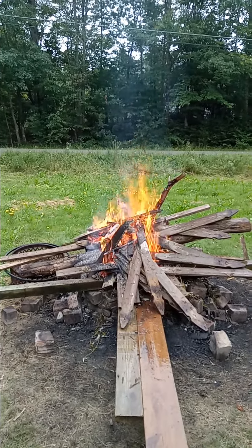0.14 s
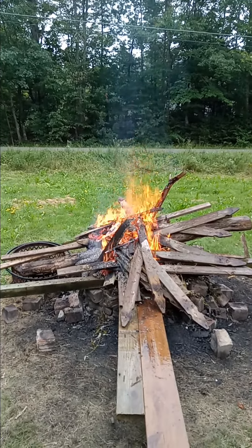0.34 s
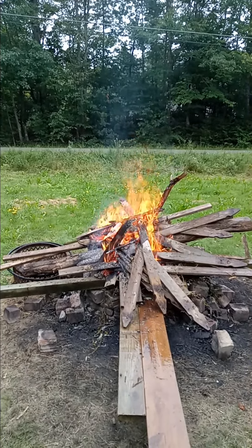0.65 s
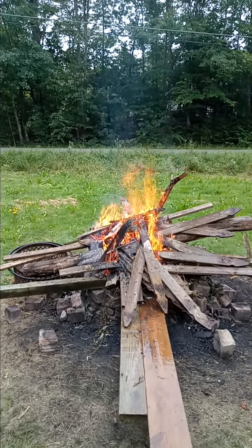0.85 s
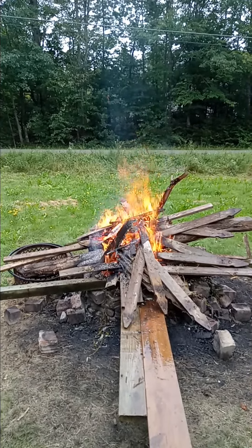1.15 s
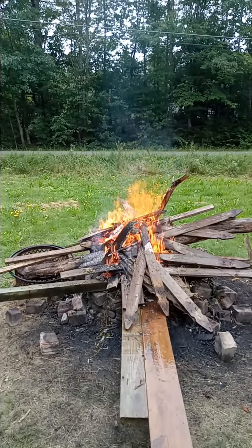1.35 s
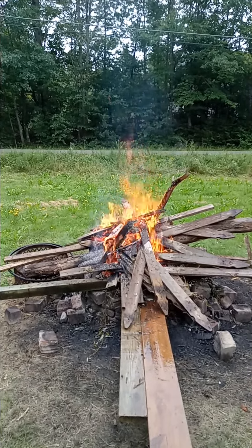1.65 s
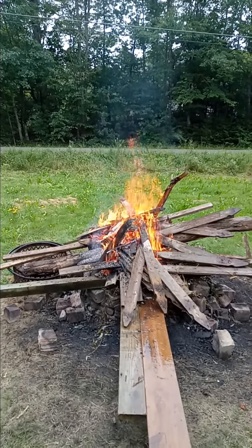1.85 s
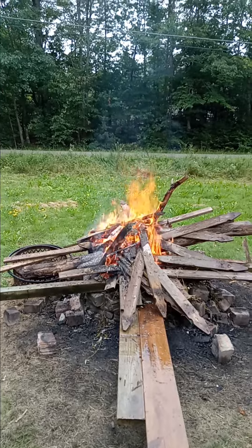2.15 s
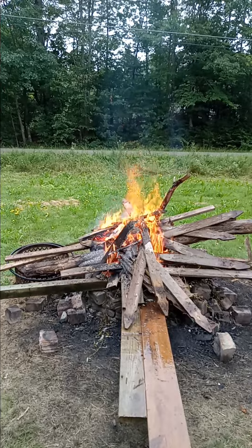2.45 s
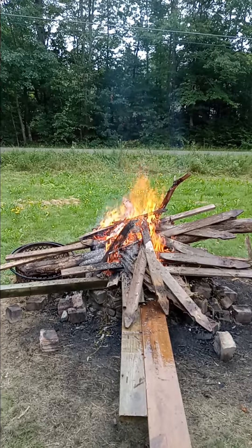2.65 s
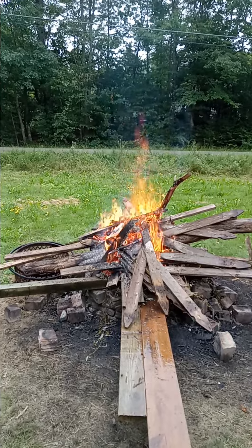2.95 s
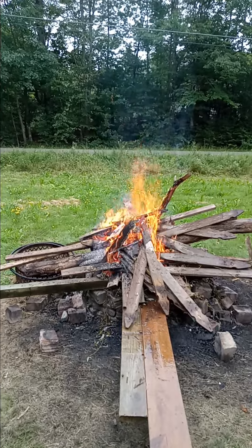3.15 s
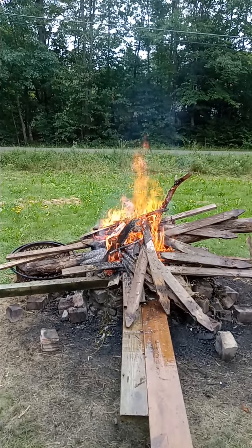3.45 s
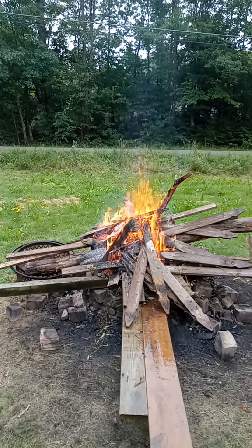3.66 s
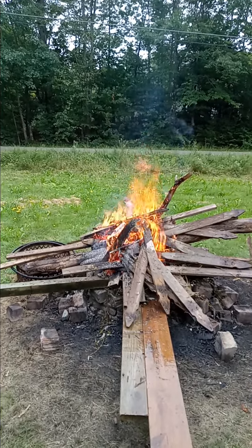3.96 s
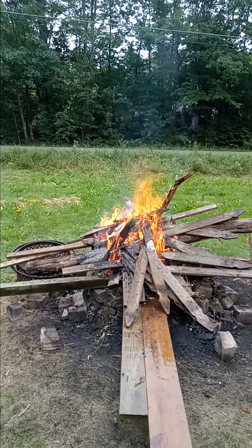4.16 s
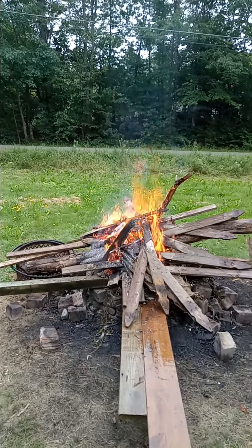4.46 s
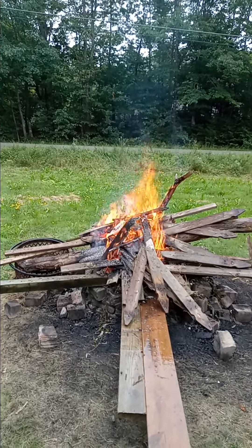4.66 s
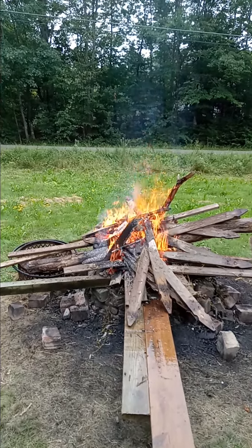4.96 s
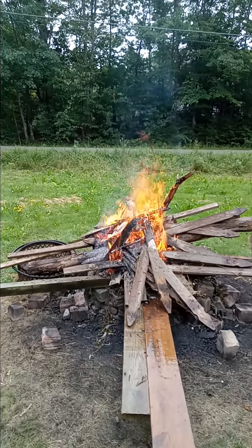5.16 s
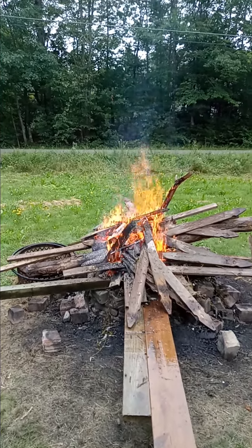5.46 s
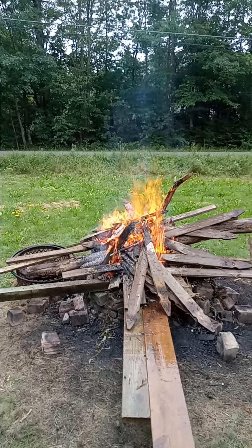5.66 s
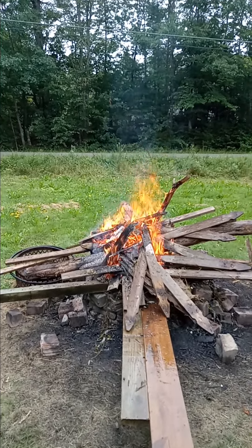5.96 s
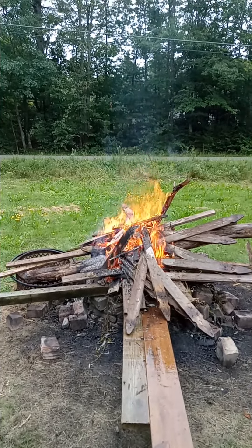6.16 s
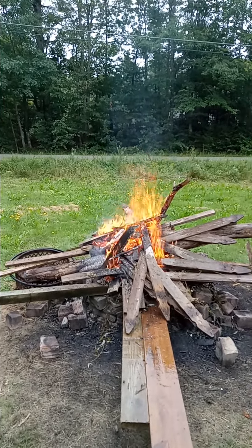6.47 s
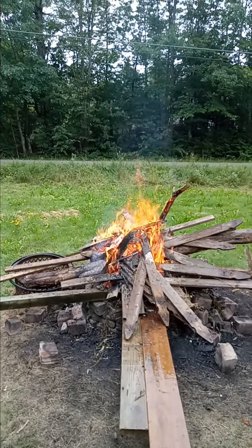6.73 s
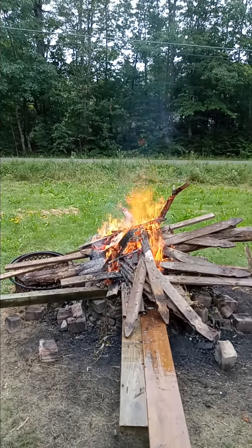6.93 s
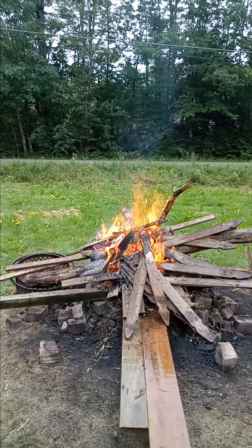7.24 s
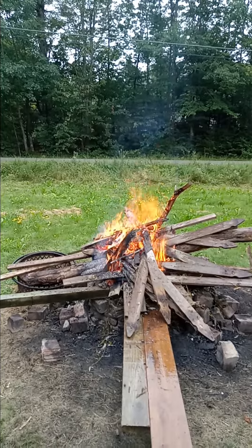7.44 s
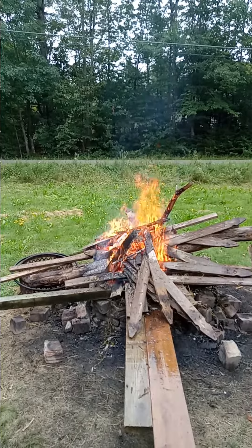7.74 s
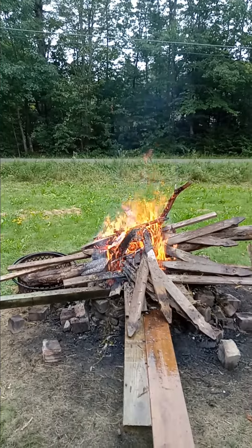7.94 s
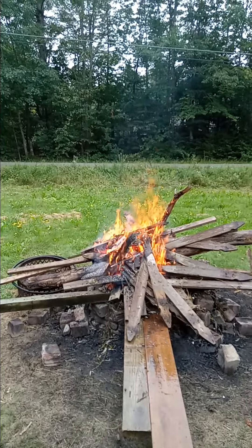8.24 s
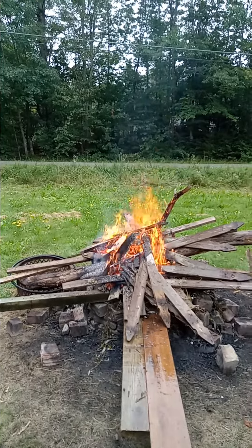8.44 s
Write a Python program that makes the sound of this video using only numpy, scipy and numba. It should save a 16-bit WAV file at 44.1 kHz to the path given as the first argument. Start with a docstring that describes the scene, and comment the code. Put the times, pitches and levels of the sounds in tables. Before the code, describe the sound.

A pile of planks burns outdoors, heard from about two metres on a phone. Sharp resin pops, woody cracks and fine ticks scatter irregularly, with brief sizzling puffs between them. Activity thins after two seconds, then thickens into clusters from four seconds on, with a heavy thump around 5.6 and a very loud crack near 7.4. The flames flutter softly in the bass, over a faint wavering hum, in a dry open space.

```python
"""On a lawn, a pile of planks burns two metres from a phone.
Flames rumble and roar as filtered noise; a far machine hums as a wavering tone. Pockets of steam and resin pop
and small embers tick as short bursts of noise. Gas jets sizzle out of the cracks as swelling puffs of hiss,
and a few puffs of pressure thump the microphone. The phone's gain control ducks after every loud pop."""
import sys
import numpy as np
from scipy import signal
from scipy.fft import rfft, irfft
from scipy.io import wavfile
from scipy.ndimage import uniform_filter1d
from numba import njit

SR = 44100
rng = np.random.default_rng(int(sys.argv[2]) if len(sys.argv) > 2 else 0)


def output_pcm(signal):
    """Save a mono or channel-first signal as 16-bit PCM at the path in sys.argv[1].

    Samples are clipped to [-1, 1] before scaling.
    """
    pcm = np.clip(np.atleast_2d(signal).T, -1, 1) * 32767
    wavfile.write(sys.argv[1], SR, np.round(pcm).astype(np.int16))


N = 379260

# All levels are those ahead of the phone's gain control.
# Pops of steam and resin: t/s, peak of the main crack/dB, centre f/Hz,
# woody bass (rms of its first 6 ms against that peak)/dB
POPS = [(.359, -18.5, 4800, -32), (0.397, -28.5, 1500, -41), (.543, -17, 2200, -17.5),
        (0.549, -17.5, 5000, -23), (.825, -12.5, 2720, -15.5), (1.541, -12.5, 4400, -33),
        (1.676, -27, 6070, -25), (1.716, -29.5, 1950, -30), (1.731, -15.5, 2580, -19),
        (1.743, -23, 4730, -14), (1.838, -5, 3530, -31), (1.987, -23, 6300, -40), (2.131, -13, 4620, -32.5),
        (2.982, -14, 3320, -41), (3.206, -17, 2880, -15.5), (3.392, -10.5, 2660, -22.5),
        (3.934, -11.5, 4570, -30.5), (3.968, -9.5, 4600, -29.5), (4.082, -15.5, 3670, -25),
        (4.147, -9.5, 1400, -13), (4.168, -0.5, 7560, -27), (4.227, -22.5, 1340, -5.5),
        (4.311, -28.5, 3400, -20.5), (4.688, -19, 6160, -34.5), (4.707, -25.5, 2100, -25),
        (4.84, -24, 3200, -36), (4.919, -12.5, 2270, -20.5), (4.974, -10, 3440, -25.5),
        (5.063, -18, 5600, -20.5), (5.07, -13, 2860, -22), (5.209, -16.5, 3500, -32),
        (5.239, -24.5, 1980, -16), (5.257, -12.5, 5800, -30), (5.266, -16, 5600, -21.5),
        (5.291, -12.5, 5260, -21.5), (5.316, -4.5, 5530, -26), (5.743, -12.5, 1160, -16),
        (6.296, -12, 4700, -33.5), (6.343, -15, 4560, -22.5), (6.399, -27.5, 3200, -18),
        (6.601, -18, 5630, -29.5), (6.622, -26.5, 7100, -29), (6.836, -23.5, 4200, -25),
        (7.174, -25, 6400, -32), (7.325, -18.5, 5600, -23.5), (7.364, 1.5, 2780, -24.5),
        (7.461, -20.5, 2920, -27), (7.473, -15.5, 5960, -32), (7.492, -14, 5630, -29.5),
        (7.659, -9.5, 6100, -34), (7.802, -20, 3000, -15), (7.849, -27, 5250, -29),
        (7.872, -23.5, 3300, -8.5), (7.89, -17.5, 4700, -15), (8.058, -13, 4400, -33),
        (8.443, -16.5, 3430, -34)]
# Dry ticks of bark and embers, with almost no woody bass: t/s, peak of the main crack/dB, centre f/Hz
TICKS = [(0.025, -36.5, 1850), (0.129, -20.5, 5350), (.261, -7, 5230), (.379, -21, 5170),
         (.662, -32.5, 2200), (.863, -1, 4800), (.953, -16, 5770), (1.231, -19, 5560), (1.312, -27.5, 6200),
         (1.363, -26, 4600), (1.558, -33, 6000), (1.654, -24.5, 5900), (1.82, -16.5, 2900),
         (1.944, -30, 1900), (2.346, -37, 5430), (2.471, -35, 8100), (2.669, -23.5, 5700),
         (2.704, -27.5, 2520), (2.781, -37, 2970), (2.8, -33.5, 2230), (3.115, -16.5, 4480),
         (3.347, -38, 12900), (3.371, -21, 5640), (3.435, -27, 4560), (3.461, -30.5, 3100),
         (3.513, -32, 7440), (3.53, -11, 6160), (3.582, -28, 6140), (3.793, -35, 5070), (3.879, -28, 3560),
         (4.428, -37.5, 5280), (4.446, -31, 5230), (4.572, -31.5, 6400), (4.578, -29.5, 5830),
         (4.859, -30, 2020), (4.903, -15.5, 4800), (5.021, -31, 4700), (5.123, -20, 4500),
         (5.341, -19.5, 7650), (5.416, -15, 6100), (5.494, -32.5, 5970), (5.555, -16.5, 5300),
         (5.595, -4.5, 8640), (5.667, -18.5, 5300), (5.899, -23, 7200), (6.039, -12, 5300),
         (6.076, -14, 5100), (6.251, -33, 5560), (6.275, -18.5, 5000), (6.665, -33.5, 5750),
         (6.704, -25, 6160), (6.766, -31.5, 3750), (6.819, -19.5, 6700), (6.895, -33, 2900),
         (6.94, -33.5, 7000), (6.953, -37, 5900), (7.024, -35.5, 5700), (7.053, -25, 6000),
         (7.126, -31, 5370), (7.146, -39, 6000), (7.269, -18, 6700), (7.311, -17.5, 1620),
         (7.449, -30, 3000), (7.525, -25, 5450), (7.568, -30.5, 4800), (7.608, -28.5, 3740),
         (8.01, -33, 2560), (8.107, -30, 5430), (8.136, -18.5, 6200), (8.412, -29.5, 7700),
         (8.513, -25.5, 8400)]
# Colour of the ground reflection and the microphone port: f/Hz, level/dB
PHONE = [(200, -12.5), (451, -16), (689, -5), (1020, -10.5), (1360, 6.5), (1640, -2), (2210, 2.5),
         (3310, 1), (3840, -4), (5450, 1), (8810, -9), (11400, -24), (13700, -33.5), (15200, -24.5)]
# Puffs of gas: t of the top/s, nominal fade time/ms, nominal top level/dB, centre f/Hz
PUFFS = [(.135, 27.5, -54, 5460), (0.364, 45, -44.5, 5200), (0.56, 22.5, -53, 4230),
         (0.674, 23.5, -53.5, 2900), (0.899, 43.5, -55.5, 5370), (1.242, 23, -61, 4960),
         (1.671, 24, -59, 4500), (1.736, 23, -50, 3500), (1.91, 64.5, -41.5, 4340),
         (2.204, 50.5, -45.5, 5100), (3.058, 32, -55, 6660), (3.28, 34.5, -52, 3320),
         (3.463, 35, -48, 3030), (3.6, 38.5, -50.5, 7250), (3.799, 17, -64, 5470), (4.244, 50, -37.5, 8900),
         (4.25, 48, -46.5, 2580), (4.711, 27, -44, 6250), (4.849, 28, -54, 3200), (5.062, 49, -33, 4340),
         (5.16, 93.5, -49.5, 3080), (5.68, 15.5, -48, 5060), (5.762, 18, -39, 5300), (6.086, 33, -61, 5340),
         (6.275, 20.5, -70, 4500), (6.62, 24.5, -57, 4470), (6.83, 27, -67, 4500), (7.185, 20.5, -52, 5500),
         (7.44, 40, -47.5, 2750), (7.56, 46.5, -48.5, 3100), (7.709, 47.5, -45, 10100),
         (7.915, 44, -32.5, 3640), (8.05, 69, -51, 3800), (8.151, 20.5, -59, 4960), (8.478, 38, -44, 6000)]

SIZE = 2048  # length of one burst, samples
REACH = 8192  # samples worked out on each side of a puff's top
MS = .001  # seconds in a millisecond


def undb(db):
    """Turns dB into a plain factor."""
    return 10 ** (np.asarray(db) / 20)


def level(x, db):
    """Sets the average strength (rms) of a sound."""
    return x * undb(db) / np.sqrt(np.mean(x ** 2))


def shape_db(table, hz):
    """Reads a table of f/Hz and level/dB along a log-frequency axis."""
    table_hz, table_db = np.array(table).T
    return np.interp(np.log(hz + 1), np.log(table_hz), table_db)


def bell_db(hz, centre_hz, octaves):
    """A hump with 0 dB on top, 6 dB down this many octaves to either side."""
    distance = np.log2((hz + 1) / centre_hz) / octaves
    return np.maximum(-6 * distance ** 2, -70)


def ripple_db(shape, depth_db, count):
    """Random peaks and dips along frequency: the hollows between the planks around each source."""
    rough = uniform_filter1d(rng.standard_normal(shape), count, axis=-1)
    return depth_db * np.sqrt(count) * uniform_filter1d(rough, count, axis=-1)


def causal(x, db):
    """Filters rows of x by gains in dB so that they ring only after the burst that excites them."""
    size = x.shape[-1]
    # folding the cepstrum (the spectrum of the log gains) onto positive times gives minimum phase
    cepstrum = irfft(db * np.log(10) / 20, size)
    cepstrum[..., 1:size // 2] *= 2
    cepstrum[..., size // 2 + 1:] = 0
    return irfft(rfft(x) * np.exp(rfft(cepstrum)), size)


def tint(x, db_of):
    """Colours a long signal by a curve of dB over frequency."""
    hz = np.fft.rfftfreq(len(x), 1 / SR)
    return irfft(rfft(x) * undb(db_of(hz)), len(x))


def walk(rate):
    """A random wander: values drawn `rate` times a second and smoothed twice, spread near 1."""
    hold = int(SR / rate)
    steps = np.repeat(rng.standard_normal(N // hold + 1), hold)
    return 1.35 * uniform_filter1d(uniform_filter1d(steps, hold), hold)[:N]


def add(out, s, sound):
    """Mixes a sound into out from time s on, cut off at the end."""
    i = int(s * SR)
    out[i:i + len(sound)] += sound[:max(len(out) - i, 0)]


@njit
def follow(x, attack, release):
    """Follows the strength of x, with one speed for rising and another for sinking."""
    e, out = 0., np.empty(len(x))
    for i in range(len(x)):
        e += (abs(x[i]) - e) * (attack if abs(x[i]) > e else release)
        out[i] = e
    return out


def flames():
    """Soft roar in octave bands, each flickering and grainy, over a low rumble that flutters and surges."""
    # Colour of the roar: f/Hz, relative level per Hz/dB
    roar_colour = [(35, -17), (114, 2.5), (224, -13.5), (460, -18.5), (1900, -9.5), (4210, -11), (5180, -9),
                   (7700, -20), (8890, -14.5), (12100, -40), (15300, -26), (16500, -42)]
    # Surges of the rumble: t/s, level/dB
    surges = [(1.05, -54.5), (1.64, -57), (4.86, -52), (6.95, -54), (8.08, -50)]
    roar_db, surge_s = -59.5, 0.044
    t = np.arange(N) / SR
    roar = 0
    for centre_hz in 40 * 2. ** np.arange(9):
        flicker = undb(2.4 * walk(12.0) + 2.35 * walk(60))
        band = tint(rng.standard_normal(N),
                    lambda hz: shape_db(roar_colour, hz) + bell_db(hz, centre_hz, 0.89))
        roar = roar + flicker * band
    rumble = tint(rng.standard_normal(N), lambda hz: bell_db(hz, 71.5, 0.38))
    strength = undb(-70.5 + 5.6 * walk(7))
    for s, surge_db in surges:
        strength = strength + undb(surge_db) * np.exp(-((t - s) / surge_s) ** 2)
    return level(roar, roar_db) + level(rumble, 0) * strength


def hum():
    """The far machine: a low sine tone whose pitch and strength waver."""
    middle_hz, middle_db = 120.2, -65.5
    turns = np.cumsum(middle_hz + 1.2 * walk(21)) / SR
    strength = np.sqrt(2) * undb(middle_db + 2.0 * walk(12))
    return strength * np.sin(2 * np.pi * turns)


def embers(count=650):
    """Small ticks of random size and colour, made like pops; many crowd round the puffs of gas."""
    crowd_share, crowd_spread = .5, 2  # share of ticks near a puff, furthest distance in nominal fade times
    when, size, pitch, wood, crowd, puff = rng.random((count, 6)).T
    chosen = (puff * len(PUFFS)).astype(int)
    top_s, fade_ms = np.array(PUFFS)[chosen, :2].T
    near_puff_s = top_s + crowd_spread * fade_ms * MS * (2 * when - 1)
    s = np.where(crowd < crowd_share, near_puff_s, when * N / SR)
    peak_db = np.minimum(-51 - 2.13 * np.log(size), -38)  # many weak ticks, few strong ones
    centre_hz = 2600 * 4.5 ** pitch
    bass_db = -38 + 20 * wood
    return pops(np.c_[s, peak_db, centre_hz, bass_db])


def pops(table):
    """Fibres tear for a moment, burst, splinter on for a few ms and scatter among the planks."""
    s, peak_db, centre_hz, bass_db = np.transpose(table)[:, :, None]
    chance = rng.standard_normal((len(s), 2 * SIZE + 2))
    noise, unevenness = chance[:, :SIZE], chance[:, SIZE:-2]
    t = np.arange(SIZE) / SR - .0016  # the burst comes 1.6 ms into the row
    # treble is stronger against the peak in loud and high pops, with a random scatter
    treble_db = -30 + 0.33 * peak_db + 8.5 * np.log2(centre_hz / 4000) + 4.5 * chance[:, -2:-1]
    # deeper bursts come from bigger pockets and last longer
    last_s = .0015 * (4000 / centre_hz) ** .3 * np.exp(.15 * chance[:, -1:])

    splinters = noise * undb(5.0 * unevenness)
    tearing = .45 * np.exp(t / .0007)
    dying = np.exp(-np.abs(t) / last_s)
    burst = splinters * np.where(t < 0, tearing, dying)
    burst += 5.0 * (np.arange(SIZE) == np.argmax(t >= 0))  # one sharp click at the burst
    burst += undb(-27) * noise * (t > 0) * np.exp(-t / .007)  # faint scatter afterwards

    hz = np.fft.rfftfreq(SIZE, 1 / SR)
    surroundings = shape_db(PHONE, hz) + ripple_db((len(s), len(hz)), 4.2, count=12)
    # the pop's own hump stands on a broad crack
    own = np.maximum(bell_db(hz, centre_hz, 0.55), bell_db(hz, 4780.0, 1.466) - 10.0)
    sound = causal(burst, surroundings + own)
    sound /= np.abs(sound).max(axis=1, keepdims=True)
    woody_bass = bell_db(hz, 590.0, 0.99)
    treble_edge = bell_db(hz, 14130.0, 0.55)
    for hump, part_db in [(woody_bass, bass_db), (treble_edge, treble_db)]:
        part = causal(burst, surroundings + hump)
        early_rms = part[:, :SIZE // 8].std(axis=1, keepdims=True)
        sound = sound + part * undb(part_db) / early_rms
    out = np.zeros(N)
    for start, row in zip(s[:, 0], sound * undb(peak_db)):
        add(out, start, row)
    return out


def ticks():
    """Dry ticks of bark and embers: pops with almost no woody bass."""
    bass_db = -60
    return pops([(*row, bass_db) for row in TICKS])


def jets():
    """Gas sputters from cracks: puffs of grainy hiss; a faint sigh of leftover gas trails each pop and tick."""
    # Narrow core and broad edge of the hiss: distance from centre to 6 dB down/octaves,
    # share of the puff's swell and fade times, level/dB added to the puff's
    layers = [(.38, 0.86, -5.5), (.72, 0.89, 0)]
    swell_share = 0.72  # a puff swells in this share of the time it takes to fade
    sigh_delay_s, sigh_fade_s = 0.0048, .02
    sigh_db, sigh_db_per_db = -42.5, 0.55  # level after a 0 dB pop, change per dB of pop peak
    t = np.arange(-REACH, REACH) / SR
    leaks = []
    for _ in layers:
        sputter = undb(2.8 * walk(600) + 1.2 * walk(100))
        leaks.append(np.pad(rng.standard_normal(N) * sputter, REACH, "wrap"))

    puffs = [(s, swell_share * fade_ms * MS, fade_ms * MS, top_db, centre_hz)
             for s, fade_ms, top_db, centre_hz in PUFFS]
    for s, peak_db, centre_hz, *_ in POPS + TICKS:
        top_db = sigh_db + sigh_db_per_db * peak_db
        puffs.append((s + sigh_delay_s, sigh_delay_s, sigh_fade_s, top_db, centre_hz))

    out = np.zeros(len(leaks[0]))  # has REACH spare samples at each end
    hollows = ripple_db((len(puffs), REACH + 1), 5.6, count=50)
    for (s, swell_s, fade_s, top_db, centre_hz), hollow in zip(puffs, hollows):
        for leak, (octaves, share, part_db) in zip(leaks, layers):
            hiss = tint(leak[int(s * SR):][:len(t)], lambda hz: (
                shape_db(PHONE, hz) + hollow + np.maximum(bell_db(hz, centre_hz, octaves), -15)))
            distance = np.abs(t / share / np.where(t < 0, swell_s, fade_s))
            add(out, s, level(hiss, top_db + part_db) * undb(-6 * distance ** 1.5))
    return out[REACH:-REACH]


def thump():
    """One heavily damped swing of the microphone's bass end for each puff of pressure."""
    # Puffs of pressure that reach the microphone: t/s, swing level before damping/dB, f/Hz
    thumps = [(5.596, -7, 110), (5.745, -31.5, 237), (7.368, -22.5, 234)]
    t = np.arange(SIZE * 2) / SR
    out = np.zeros(N)
    for s, swing_db, hz in thumps:
        swing = np.exp(-t / 0.0041) * np.cos(2 * np.pi * hz * t + 0.82)
        soft_start = np.minimum(t / 0.00056, 1)
        add(out, s, undb(swing_db) * swing * soft_start)
    return out


def scene():
    """The whole fire and the machine, mixed to one channel."""
    mix = flames() + hum() + embers() + ticks() + jets() + pops(POPS) + thump()
    return mix[None]


def record(dry):
    """The phone ducks at peaks, dips again later and deepest in the bass, and rounds high peaks.
    Nothing is heard above about 16.7 kHz."""
    # the microphone loses the deepest bass
    dry = signal.sosfilt(signal.butter(3, 46., "high", fs=SR, output="sos"), dry)
    # gain control pulls down within a few ms and recovers slowly
    quick = follow(dry[0], 1 / (.003 * SR), 1 / (.04 * SR))
    gain = np.minimum(1, (undb(-33.0) / (quick + 1e-9)) ** 0.4)
    # a second dip follows 9 ms late
    slow = follow(dry[0], 1 / (0.0047 * SR), 1 / (.06 * SR))
    late = np.minimum(1, (undb(-38.5) / (slow + 1e-9)) ** 0.46)
    late = np.roll(late, int(0.009 * SR))
    bass = signal.sosfilt(signal.butter(1, 1500., fs=SR, output="sos"), dry)
    ducked = bass * late + (dry - bass) * np.sqrt(late)
    rounded = .45 * np.tanh(ducked * gain / .45)
    highest_hz = 16700
    return signal.sosfilt(signal.ellip(10, .2, 80, highest_hz, fs=SR, output="sos"), rounded)


dry = scene()
out = record(dry)
output_pcm(out)
```